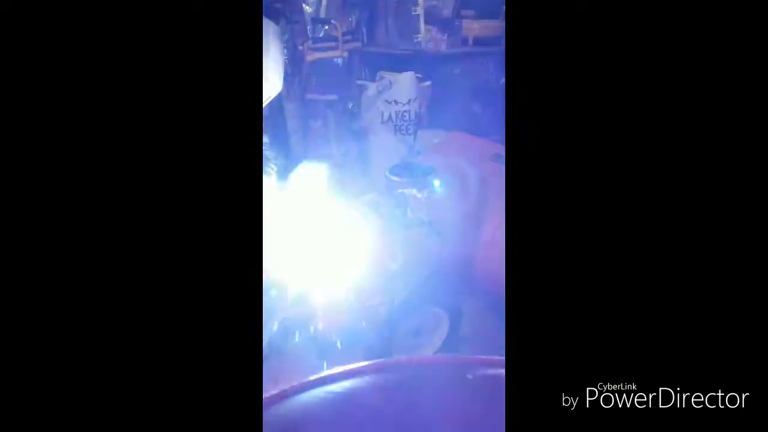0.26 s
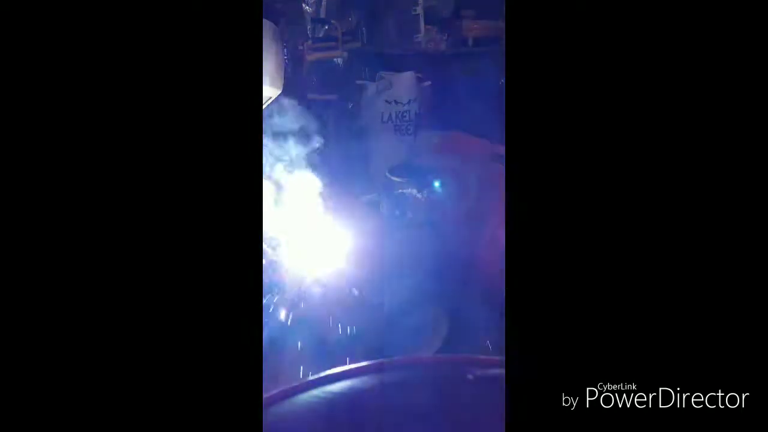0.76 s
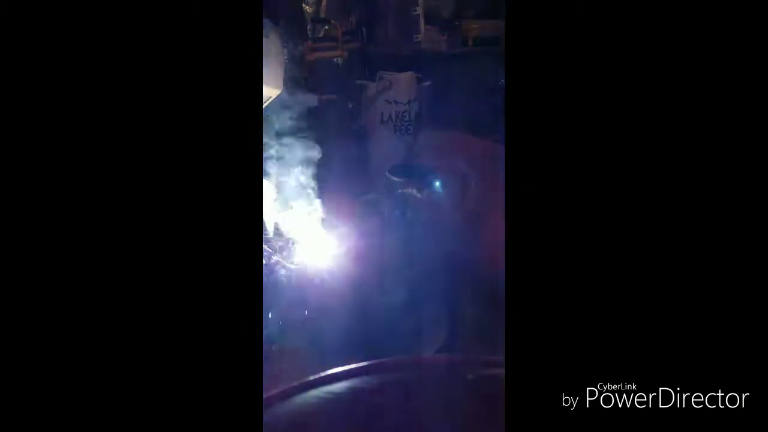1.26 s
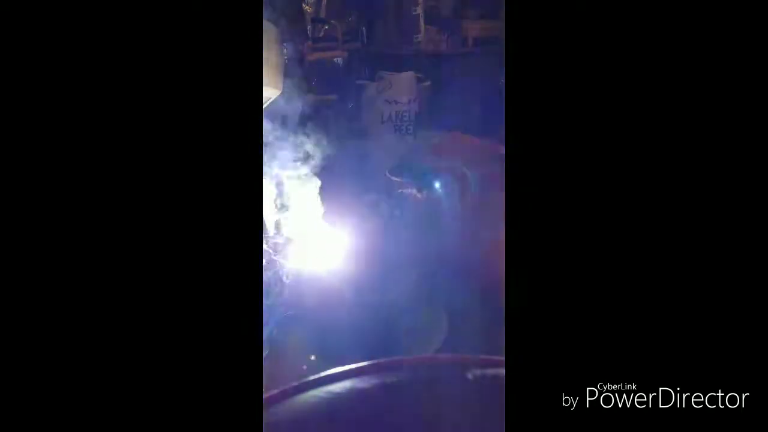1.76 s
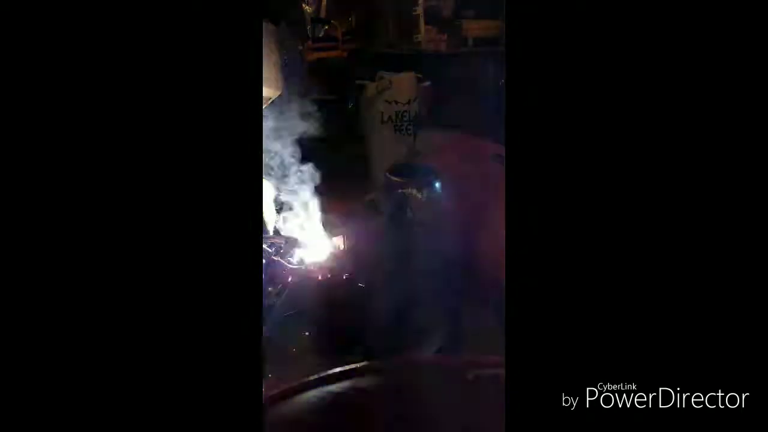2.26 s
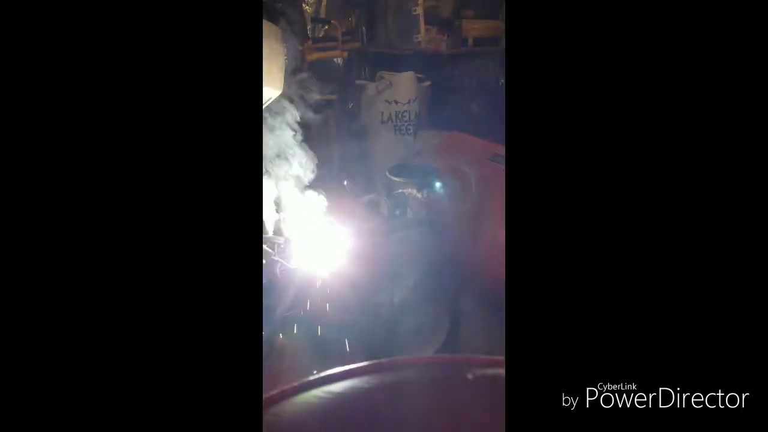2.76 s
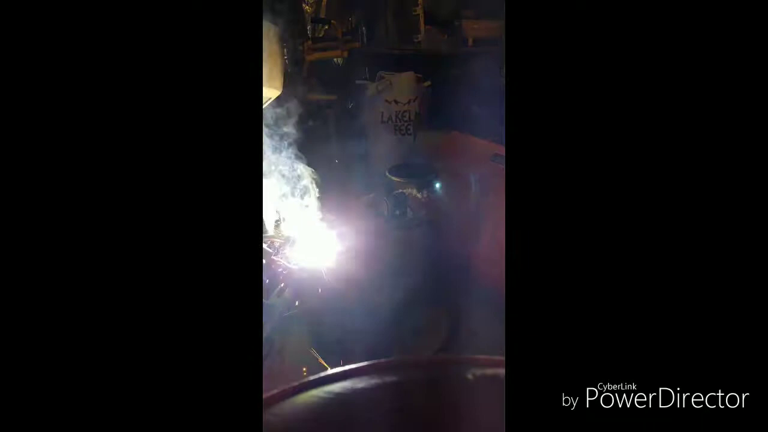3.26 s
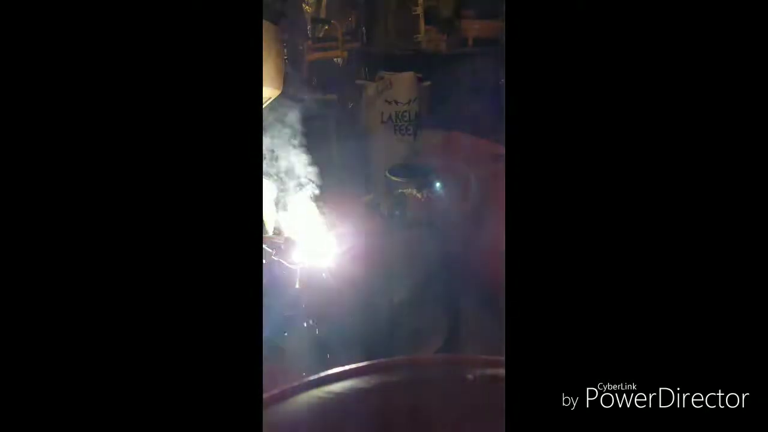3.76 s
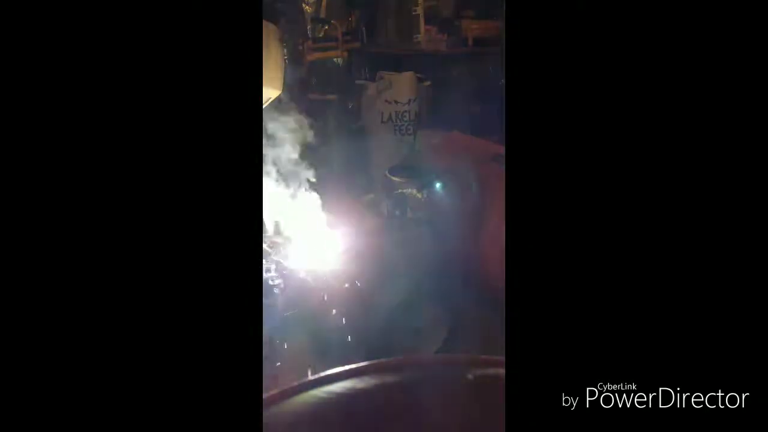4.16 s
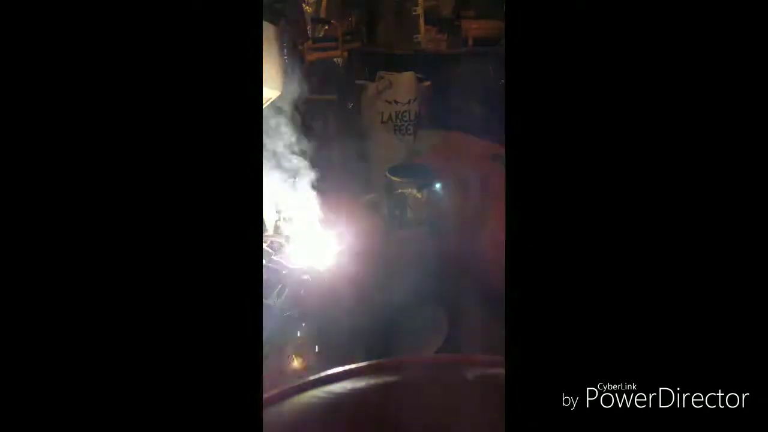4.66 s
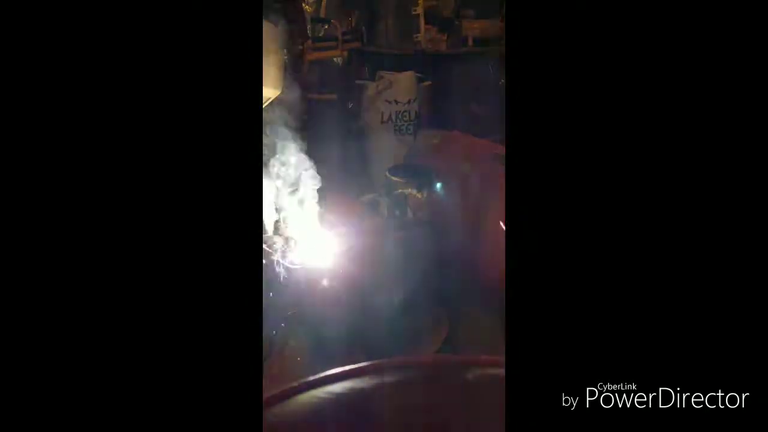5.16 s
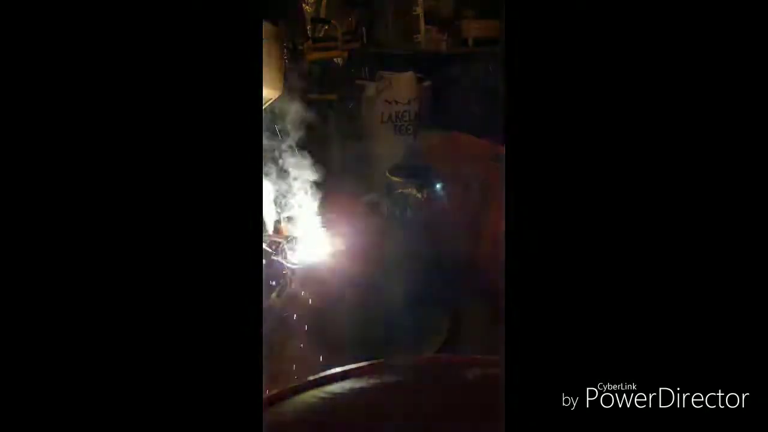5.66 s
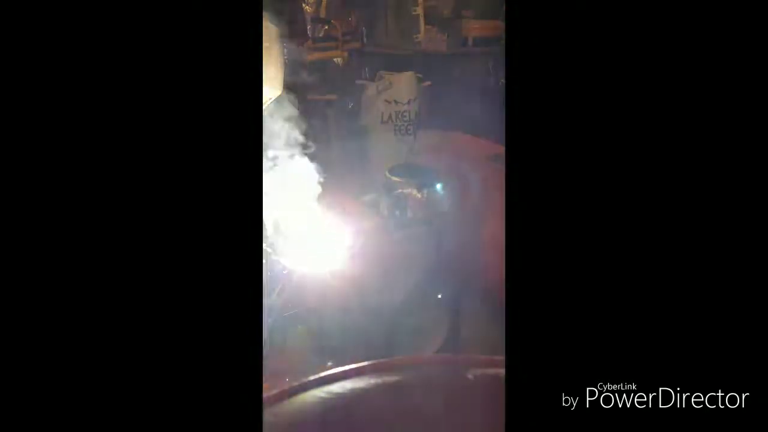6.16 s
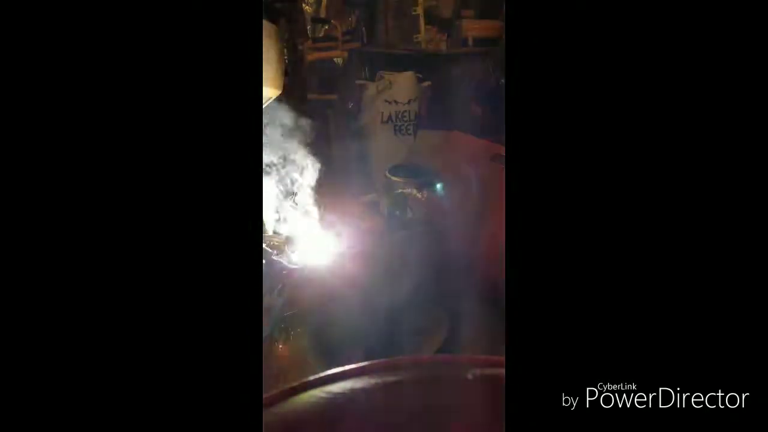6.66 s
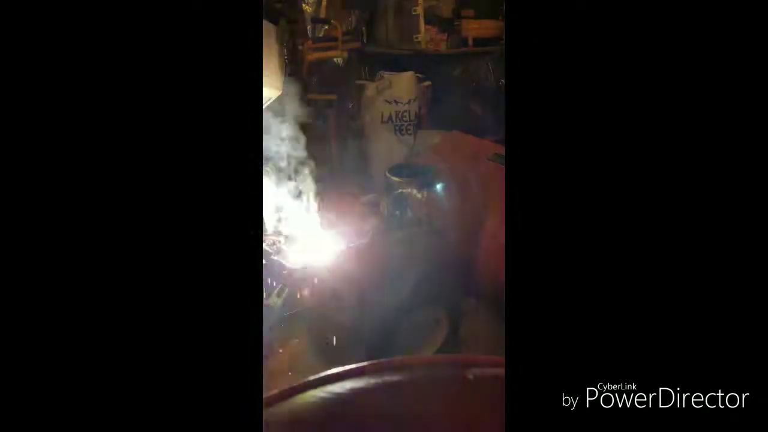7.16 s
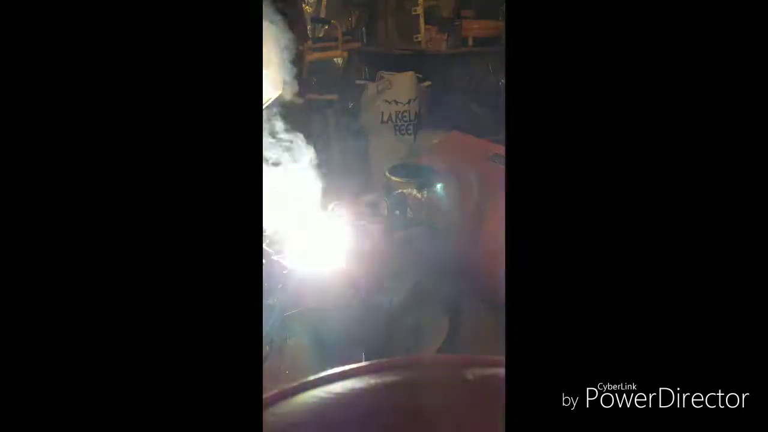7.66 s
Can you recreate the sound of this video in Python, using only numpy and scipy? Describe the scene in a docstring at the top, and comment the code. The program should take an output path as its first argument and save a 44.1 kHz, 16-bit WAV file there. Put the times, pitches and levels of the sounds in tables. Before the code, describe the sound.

Close, dry electric crackling from a welding arc, with fizzing spatter and random hard snaps, runs unbroken in a small garage.

```python
"""Sharp pops over a dense crackle: an arc welder runs a bead on steel in a garage, a little to the left.
Molten drops short the arc and snap as single clicks; tiny discharges crackle as random clicks in clumps.
Echoes, a short tail and low modes colour the clicks at two microphone ports. Spatter fizzes all around,
a noise hiss fades within the first second, faint low pulses swing at a few moments,
and welder and fan hum faintly."""
import sys
import numpy as np
from scipy import signal
from scipy.fft import rfft, irfft
from scipy.io import wavfile
from scipy.ndimage import uniform_filter1d, map_coordinates

SR = 44100
rng = np.random.default_rng(int(sys.argv[2]) if len(sys.argv) > 2 else 0)


def digitize_waveform(pressure):
    """Quantize a signal to 16-bit integers and store it at the path in sys.argv[1].

    Rows of a 2-D input are taken as channels; values are limited to [-1, 1].
    """
    field = np.atleast_2d(pressure).T
    bounded = np.clip(field, -1, 1)
    quanta = np.round(bounded * 32767).astype(np.int16)
    wavfile.write(sys.argv[1], SR, quanta)


N = 348390

# drops that short the arc; the row at 7.2161 s is the 7.2084 s pop coming back off a wall: t/s, body level/dB,
# bite level/dB, treble level/dB
DROP_POPS = [(0.0316, -5, -13, -0.5), (0.075, -0.5, 0, 2.5), (0.227, -5, -1, -2), (0.2353, -2.5, 4.5, -1),
             (0.2708, 1.5, 1, -5), (0.4022, -11, -5, -7), (0.5088, -4, -11, -7), (0.591, -8, -11, -16),
             (0.6084, -7, -10, -7), (0.6169, -2, -4, -6), (0.6331, -2, 0, -4), (0.722, -19, -12, -11),
             (0.7904, -17, -8, -7), (0.8785, -0.5, -7, -18), (0.892, 4.5, -0.5, -10),
             (0.9804, 4.5, -5, 0.5), (1.0704, -20, -16, -5), (1.1151, 1, -15, -15), (1.1506, -12, -18, -9),
             (1.2284, -6, -6, -4), (1.2338, -14, -12, -8), (1.2604, -5, -13, -3), (1.333, -15, -6, -13),
             (1.3421, -5, -13, -3), (1.3698, -24, -19, -11), (1.4594, -1, -4, -6), (1.4716, -13, -9, -10),
             (1.5172, -15, -23, -11), (1.5498, -11, -10, -16), (1.5806, -20, -5, -4), (1.5855, -4, -7, -10),
             (1.642, -2, -4, -5), (1.6683, -5, -5, -4), (1.681, -8, -7, -8), (1.6877, -7, -5, -1),
             (1.7472, -8, -13, -5), (1.768, -6, -4, -5), (1.7924, -9, -3, -3), (1.944, -20, -21, -7),
             (1.9517, -12, -2, -4), (2.013, -1.5, -7, -2), (2.0604, 0, -17, -3), (2.0658, -3, -1, -1),
             (2.0752, -1.5, 0, 0), (2.1161, -16, -5, -3), (2.1286, -21, -12, -10), (2.1941, -9, -4, -4.5),
             (2.2474, 6, 3, 3.5), (2.3123, -11, -13, -4), (2.3518, 2, 1, -4), (2.4611, -1.5, -11, -5),
             (2.5008, -10, -8, -6), (2.5246, -23, -16, -8), (2.5506, 8, -1, -1), (2.6206, -2.5, -15, -5),
             (2.6383, -12, -15, -13), (2.6924, 1.5, -11, -13), (2.7381, -6, -17, -15), (2.7915, 3, -4, -10),
             (2.8657, -17, -4, -11), (2.8875, -4, -4, -3), (2.9047, 2, -7, 1), (2.9681, -3, -4, -6),
             (2.9745, -2.5, -1.5, -3), (3.002, -2, 1, -4), (3.0402, 1.5, -6, -15), (3.1143, -2, -22, -11),
             (3.1333, -5, -17, -15), (3.17, -16, -16, -1), (3.2009, -1, -6, -15), (3.2384, 6.5, -1, -22),
             (3.2962, 0, 1, -4), (3.378, -4, -22, -6), (3.4012, -16, -6, -16), (3.4339, -9, -21, -4),
             (3.499, -2.5, -16, -3), (3.526, 1, 0, -1.5), (3.5993, -15, -17, -8), (3.626, -5, -10, -5),
             (3.6365, 5, -5, -22), (3.6453, 5, -6, 0), (3.6663, 1, -11, -1), (3.6768, -8, -3, -7),
             (3.6822, 4, -2, -6), (3.6902, 1.5, 2, 3), (3.7011, -13, -7, -2), (3.7406, -18, -16, -10),
             (3.7736, 1.5, -4, -5), (3.7926, 5.5, -6, -2), (3.8011, -3, -4, -5), (3.8612, 1, 3.5, 1.5),
             (3.9206, -15, -12, -8), (3.9274, -4, 4, 3), (4.0013, -13, -12, -7), (4.1012, -6, -7, -11),
             (4.2928, -8, -15, -10), (4.2987, -22, -18, -9), (4.35, -3.5, -6, -5.5), (4.3808, -20, -14, -9),
             (4.406, -27, -11, -7.5), (4.4507, -5.5, -7, -8), (4.5053, -12, -15, -17),
             (4.5384, -12, -8, -7), (4.548, -18, -25, -9), (4.7164, -0.5, -2.5, -4), (4.7227, -12, -19, -8),
             (4.77, -14, -16, -8), (4.8403, -8, -9, -8), (4.8573, -6, -10, -14), (4.9992, -5.5, -4, -5),
             (5.0296, -5, -5, -8), (5.0689, -2.5, -10, -7), (5.0953, -24, -13, -17), (5.1978, -4, -7, -6.5),
             (5.209, -8, -7, -7), (5.2212, -2.5, -11, -18), (5.321, -6, -6, -2), (5.3677, -6, -15, -10),
             (5.3994, -1.5, 1.5, 5), (5.4368, -9, 3, 0), (5.4456, -20, -7, -8), (5.5072, -8, -6, -1.5),
             (5.5275, -5, 0, -5), (5.5744, -19, -14, -14), (5.5875, -14, -11, -10), (5.698, -10, -10, -8),
             (5.7038, -7, -2.5, -4), (5.73, -19, -16, -7), (5.7504, -18, -14, -5.5), (5.7846, -19, -11, -5),
             (5.799, -10, -21, -12), (5.8373, -3, -8, -5), (5.8517, -14, -17, -9), (5.8559, -1.5, -5, -16),
             (5.8777, -5, -6, -19), (5.9439, -2, -9, -20), (6.11, -12, -11, -7), (6.1244, -11, -5, -11),
             (6.1722, -2, -6, -4), (6.1931, -3, -5, -5), (6.2215, -10, -7, -5), (6.2364, -22, -11, -8),
             (6.2484, -23, -8, -9), (6.3486, -4, -17, -14), (6.436, -4.5, -28, -13), (6.4704, -3.5, 2, -4),
             (6.475, -12, -11, -12), (6.546, -18, -24, -8), (6.5652, -19, -16, -16), (6.5916, 1, -7, -2),
             (6.6162, -7, -14, -3), (6.6507, 1.5, -7, -3), (6.657, -7, -7, -3), (6.6727, -12, -14, -6),
             (6.796, -15, -13, -8), (6.8494, -2, -13, -13), (6.8595, -17, -5, -9), (6.8771, -0.5, -2, -2),
             (6.928, -4, -9, -12), (6.9694, 4, 3, 0), (7.0372, 1.5, 1, -5), (7.0843, -3, -14, -8),
             (7.128, -1, -4, -6), (7.1694, -3, -7, 0), (7.1924, -17, -9, -8), (7.2084, 3, 1, -6),
             (7.2161, -12, -12, -5), (7.2759, 1.5, -5, -9), (7.2934, 1.5, 4, 4.5), (7.3763, 1, -5, -2),
             (7.391, 2, -6, -0.5), (7.411, -2, -7, -3), (7.4212, -11, -12, -14), (7.5159, -2.5, -1.5, -0.5),
             (7.5404, -17, -13, -6), (7.5712, -17, -25, -12), (7.5985, -9, -12, -5),
             (7.6392, -3.5, -2.5, -2), (7.6776, -10, -9, -10), (7.7049, -3, -6, -8),
             (7.7118, -13, -15, -12), (7.77, -5, -4, -3), (7.8191, 0, -9, -7.5), (7.872, -14, -13, -10)]
# the burning arc: t/s, burn level/dB, extra weight of its mids and lows/dB
ARC_BURN = [(0.0, -33.5, 1.5), (0.44, -32.5, -0.5), (0.86, -35, 2.5), (1.14, -36, 2.5), (1.89, -30.5, 4.5),
            (2.38, -32.5, 1), (3.78, -31, 3.5), (4.0, -35.5, 4), (4.4, -37.5, 5.5), (4.53, -41, 3),
            (4.8, -40.5, 0), (5.2, -35, 1), (5.3, -34, 1.5), (5.41, -37, 4.5), (5.7, -34.5, 5.5),
            (6.25, -35.5, 4.5), (7.08, -31.5, 0), (7.63, -36.5, 5.5), (7.9, -36.5, 3)]
ECHO_CUT_HZ = 815  # small surfaces return little bass
LEAD_IN = 64  # samples ahead of the direct sound, leaving room for the shading filter


def pops():
    """Each pop is a snap of pressure with its own body and bite; its treble is a brief flurry of sparks."""
    body_hz, treble_hz, cut_hz = 3540, 7040, 70  # body under the first, treble over the second
    short_s, long_s = .00008, .0009  # flurry decay: brief for a strong pop, up to the longer for a weak one
    lead, length = 24, 128  # samples of flurry before its centre, and in all
    rows = np.r_[DROP_POPS, small_pops()]
    draws = rng.standard_normal((len(rows), length + 1))
    weak = np.interp(-rows[:, 3:], [3, 12], [0, 1])  # treble from -3 dB down to -12 dB
    stretch = weak * abs(np.tanh(draws[:, :1]))
    decay = SR * (short_s + (long_s - short_s) * stretch)
    sparks = rfft(draws[:, 1:] * np.exp(-abs(np.arange(length) - lead) / decay))
    sparks = irfft(sparks / np.sqrt(uniform_filter1d(abs(sparks) ** 2, size=9)))  # even in colour

    at = np.round(rows[:, 0] * SR).astype(int)
    body, bite, treble = np.zeros((3, N + length))
    body[at] = gain_of(rows[:, 1])
    bite[at] = gain_of(rows[:, 2])
    np.add.at(treble, at[:, None] + np.arange(length) - lead, gain_of(rows[:, 3:]) * sparks)
    snaps = lows(body - bite, body_hz) + lows(bite - treble, treble_hz) + treble
    return signal.lfilter(*signal.butter(1, cut_hz, "high", fs=SR), snaps[:N])  # too brief to move bass


def small_pops(per_s=25, over_arc_db=16, spread_db=6):
    """Lesser drops at chance moments, each band's size drawn around the level of the burn."""
    draws = rng.random((round(per_s * N / SR), 4))
    s = .01 + draws[:, 0] * (N / SR - .02)
    burn = curve(ARC_BURN, 1)[(s * SR).astype(int), None]
    return np.c_[s, burn + over_arc_db + spread_db * (2 * draws[:, 1:] - 1)]


def crackle(clumps, per_s=700., spread_db=4.4):
    """Some hundreds of tiny discharges a second of random sign, a few of them large."""
    chance, size, sign = rng.random(N), rng.exponential(1, N), rng.choice([-1., 1.], N)
    train = (chance < per_s / SR) * gain_of(spread_db * np.minimum(size, 4.5)) * sign
    train = evened(train * clumps) * gain_of(arc_db() - 6.0)
    weight = gain_of(curve(ARC_BURN, 2)) * flutter(depth_db=1.5, span=970)
    return tilted(train * weight, train)


def arc_db():
    """Level of the arc: slow burn, flares, and a hush while a large drop bridges the gap."""
    hush_s, hush_db, full_over_db = .012, -4.5, 33.  # pops this far over the burn get the full hush
    s = np.transpose(DROP_POPS)[0]
    loudest_db = np.transpose(DROP_POPS)[1:].max(0)
    burn, drops = curve(ARC_BURN, 1), np.zeros(N)
    at = np.round(s * SR).astype(int)
    drops[at] = gain_of(loudest_db - burn[at] - full_over_db)
    before = np.exp(-np.arange(4000) / (hush_s * SR))
    hush = signal.oaconvolve(drops[::-1], before)[:N][::-1]  # reversed: deepens towards the pop
    return burn + flares_db() + hush_db * np.minimum(hush, 1)


def flares_db():
    """The arc sputters up or sags, each time as one smooth bell-shaped swell or dip."""
    # bursts and sags: centre t/s, width at half height/s, rise/dB
    flares = [(.048, 0.082, 4), (.17, 0.036, -2), (.281, 0.061, 2.5), (.411, 0.053, 3), (.57, .05, 0.5),
              (.634, 0.05, 5), (.77, 0.022, -1), (.82, .05, 0), (.88, 0.046, 5.5), (.96, .03, 1),
              (1.141, 0.19, 7.5), (1.2, 0.056, -5.5), (1.257, 0.034, 5), (1.42, 0.042, 5), (1.54, .03, 0.5),
              (1.685, 0.26, 1), (1.74, 0.016, -2), (1.91, 0.038, -1), (2.01, 0.032, 0.5),
              (2.361, 0.036, 3.5), (2.42, 0.074, -2.5), (2.561, 0.099, 0), (2.692, 0.012, 6),
              (2.78, .025, -0.5), (2.9, 0.051, 1), (3.09, 0.029, -0.5), (3.19, 0.075, 5), (3.31, 0.055, 5),
              (3.44, 0.019, -1), (3.62, 0.023, 1), (3.694, 0.037, 3), (3.84, 0.021, -1), (3.935, 0.089, 6),
              (4.086, 0.035, 1.5), (4.221, 0.075, 0.5), (4.293, 0.0082, 4), (4.542, 0.048, 6),
              (4.726, 0.087, 5.5), (4.857, 0.043, 3), (4.91, .04, -1.5), (5.14, 0.042, -4.5), (5.3, .03, 3),
              (5.339, 0.041, 1.5), (5.409, 0.1, 8.5), (5.517, 0.049, 6), (5.67, 0.082, -6.5),
              (5.746, .03, 0), (5.851, 0.056, 1.5), (6.04, 0.084, -3), (6.159, .04, 0.5), (6.38, 0.06, -4),
              (6.609, 0.028, 4), (6.655, 0.036, 6), (6.72, 0.033, -4.5), (6.812, 0.049, 3.5),
              (6.882, 0.056, 3), (7.17, 0.1, 3.5), (7.41, 0.022, 11.5), (7.48, 0.033, -0.5)]
    t = np.arange(0, N / SR + .002, .001)
    swell = sum(db * np.exp(-4 * np.log(2) * ((t - s) / width) ** 2) for s, width, db in flares)
    return np.interp(np.arange(N) / SR, t, swell)


def discharge_colour():
    """Impulse response for the colour of a discharge, with the modes of garage and bench ringing in it."""
    # colour of a discharge at the microphones: f/Hz, level per Hz/dB
    spectrum = [(24, -27), (60, -34), (120, -20.5), (310, -15.5), (380, -7), (900, -7), (1450, -8),
                (1700, -4.5), (3500, -2.5), (6000, -0.5), (7800, -6), (9300, 1.5), (11700, 3),
                (14000, -0.5), (15400, -8), (15800, -28), (16600, -44)]
    # modes of the garage and bench: f/Hz, width/Hz, boost or dip/dB
    modes = [(160, 13, 12), (185, 16, 6), (242, 13, 7), (285, 9, 7), (352, 30, 8), (432, 24, 3),
             (310, 30, -5), (485, 25, -5), (520, 40, 3), (550, 30, 3), (619, 22, 6), (660, 25, 4),
             (742, 20, 7), (805, 40, -7), (851, 36, 5), (1071, 40, 4), (1211, 60, 5), (1319, 50, 5),
             (1530, 30, 4), (1583, 45, 5), (1701, 45, 5), (1798, 40, 3), (1890, 22, 6), (2148, 28, 3),
             (2245, 30, 5), (2320, 30, 2), (2406, 30, 5), (2546, 40, 3), (3074, 45, 6), (4752, 30, 5),
             (5394, 48, 5), (5772, 30, 4), (5864, 38, 4), (6518, 50, 6), (9608, 90, 4), (10563, 60, 5),
             (10970, 60, 3), (11455, 60, 4), (11688, 70, 4)]
    hz = np.fft.rfftfreq(16384, 1 / SR)
    modes_db = sum(db / (1 + (2 * (hz - f) / width) ** 2) for f, width, db in modes)
    return causal(read(spectrum, hz) + modes_db + 3.5)


def garage(x, distant, half_turns_per_s=3.0):
    """The arc wanders, so the tail of what reaches the walls drifts among three patterns of reflections."""
    out = signal.oaconvolve(x[None], near(), axes=1)[:, LEAD_IN:LEAD_IN + N]
    for k in range(3):
        turn = np.pi * (half_turns_per_s * np.arange(N) / SR + k / 3)
        share = np.sqrt(2 / 3) * np.cos(turn)  # the three powers always sum to 1
        out = out + signal.oaconvolve((distant * share)[None], tail(), axes=1)[:, :N]
    return out


def near():
    """Direct sound and first echoes at each port; the recorder's body shades and delays the right one."""
    # first echoes off bench, floor and walls: delay t/s, left level/dB, right level/dB
    echoes = [(.0005, -20, -11), (.0012, -13, -20), (.0021, -17, -12), (.0029, -20, -14), (.0043, -14, -20),
              (.0052, -22, -12), (.0063, -22, -17), (.0078, -14, -22), (.0083, -16, -11), (.0105, -13, -18),
              (.0135, -21, -15)]
    # direct sound, left port against right, beyond the plain delay: f/Hz, louder/dB, phase ahead/rad
    shadow = [(100, 0, 0), (1000, 3, -.7), (1700, 1, -1.3), (2300, -2, -.8), (3000, 2, -.3),
              (4000, 0, -.55), (5400, -2, .1), (7500, 1, 3.1), (9000, 6, 3.7), (9800, 8, 2.8),
              (11500, 3, 2.3), (12600, 5, 2.3), (13400, 4, 1.), (15300, 0, 3.1)]
    smear_s, port_lag = 0.00015, 6  # rough surfaces blur each echo; right port lags, in samples
    room = np.zeros((2, 2048))
    for s, *db in echoes:
        smear = rng.standard_normal((2, 48)) * np.exp(-np.arange(48) / (smear_s * SR))
        smear *= (gain_of(db) / np.linalg.norm(smear, axis=1))[:, None]
        room[:, LEAD_IN + round(s * SR):][:, :48] += smear
    room = signal.lfilter(*signal.butter(2, ECHO_CUT_HZ, "high", fs=SR), room)

    hz = np.fft.rfftfreq(256, 1 / SR)
    f, db, ahead = np.transpose(shadow)
    shaded = irfft(gain_of(-np.interp(hz, f, db)) * np.exp(-1j * np.interp(hz, f, ahead)))
    room[0, LEAD_IN] += 1
    room[1, :256] += np.roll(shaded, LEAD_IN + port_lag)
    return room


def tail():
    """Sparse taps of random sign, dying band by band, thin in the bass where the modes rule."""
    # decay of the tail: f/Hz, time to fall 60 dB t/s
    decay = [(300, 1), (800, 0.034), (2000, 0.25), (5500, 0.12), (14000, 0.09)]
    # level of the tail, one row a port, left then right: level/dB
    port_db = [
        [0],
        [1],
    ]
    alike_hz, rise_s = 760.0, 0.0021
    taps = np.zeros((2, SR // 2))
    at = np.arange(40, SR // 2 - 40, 20) + rng.integers(0, 20, (2, (SR // 2 - 61) // 20))
    np.put_along_axis(taps, at, rng.choice([-1., 1.], at.shape), 1)
    hz, t, z = signal.stft(taps, SR, nperseg=256)
    same = 1 / (1 + (hz[:, None] / alike_hz) ** 2)  # bass reaches both ports alike
    z[1] = same * z[0] + np.sqrt(1 - same ** 2) * z[1]
    z *= gain_of(-60 * t / read(decay, hz)[:, None])
    z *= (hz ** 2 / (hz ** 2 + ECHO_CUT_HZ ** 2))[:, None]
    out = signal.istft(z, SR, nperseg=256)[1]
    out *= np.minimum(np.arange(out.shape[1]) / (rise_s * SR), 1)
    return gain_of(port_db) * out / np.linalg.norm(out[0])


def fizz():
    """Spatter fizzes over the bench: noise partly different at each port, lagging the arc's level a little."""
    # spatter against the colour of the arc: f/Hz, level/dB
    spatter_colour = [(30, 6), (90, 5), (150, 2.5), (500, 2.5), (1000, 0), (1500, 1), (4000, 2), (8000, -2),
                      (15000, -3)]
    # likeness of left and right: f/Hz, correlation (0 to 1)
    likeness = [(30, 0.4), (90, 0.6), (200, .9), (600, 0.8), (1500, 0), (4000, 0), (15000, 0)]
    lag_s = 0.0023
    hz = np.fft.rfftfreq(N, 1 / SR)
    left, other = rfft(rng.standard_normal((2, N)))
    same = np.clip(read(likeness, hz), -1, 1)
    right = same * left + np.sqrt(1 - same ** 2) * other
    noise = irfft(np.array([left, right]) * gain_of(read(spatter_colour, hz)), N)
    lag = np.exp(-1 / (lag_s * SR))
    start_db = ARC_BURN[0][1]
    level_db = signal.lfilter([1 - lag], [1, -lag], arc_db() - start_db) + start_db
    return noise * gain_of(level_db - 2.5)


def settling():
    """While the arc settles, noise hisses in resonances that drift together and swell with each flare."""
    # resonances of the hiss: f/Hz, width/Hz, level/dB
    peaks = [(112, 35, -27), (166.5, 18, -15), (437, 7, -23), (2420, 50, -9), (2520, 91, -7.5),
             (2540, 1300, 0.5), (3980, 640, -2), (5330, 460, -4), (5880, 460, -0.5), (6580, 39, -10)]
    level_db, db_per_flare_db = -45.5, 1.67
    silent_s, fade_s = 0.98, 0.52  # the fade ends in silence at the first time
    wander = .015  # rms share by which the resonances drift
    noise = signal.lfilter(*signal.butter(3, [65., 9000.], "band", fs=SR), rng.standard_normal(SR))
    hiss = sum(gain_of(db) * evened(signal.lfilter(*signal.iirpeak(hz, hz / width, SR), noise))
               for hz, width, db in peaks)
    drift = evened(uniform_filter1d(uniform_filter1d(rng.standard_normal(N), size=2500), size=2500))
    hiss = map_coordinates(hiss, [np.cumsum(1 + wander * drift)], order=3)  # played at a drifting speed
    fade = np.clip((silent_s - np.arange(N) / SR) / fade_s, 0, 1)
    return hiss * gain_of(level_db + db_per_flare_db * flares_db()) * fade


def low_pulses(length_s=0.003):
    """Faint low pulses at a few moments: each a quick low swing, then a slower one the other way."""
    # low pulses: t/s, level before a common lift of 1 dB/dB
    pulses = [(2.069, -62), (2.619, -57), (3.929, -66), (5.4, -47), (5.799, -64)]
    s, db = np.transpose(pulses)
    train = np.zeros(N)
    train[np.round(s * SR).astype(int)] = gain_of(db + 1.0)
    u = np.arange(2000) / (length_s * SR)
    return signal.oaconvolve(train, u * np.exp(1 - u) * (1 - u / 2))[:N]


def hum():
    """The welder hums with its load: steady tones that waver a little and swell with the burn."""
    # tones: f/Hz, level against the burn/dB, rms waver/Hz
    tones = [(240, -36, 3), (285.3, -33, 2)]
    out = 0
    for hz, db, waver_hz in tones:
        drift = evened(uniform_filter1d(uniform_filter1d(rng.standard_normal(N), 4000), 4000))
        level = gain_of(db) * flutter(depth_db=4.5, span=2700)
        out = out + level * np.sin(2 * np.pi * np.cumsum(hz + waver_hz * drift) / SR)
    return np.sqrt(2) * out * gain_of(curve(ARC_BURN, 1))


def fan():
    """One faint tone, likely the welder's cooling fan, drifting in pitch and wavering in level."""
    # the tone: t/s, f/Hz, rms level/dB
    fan_tone = [(0, 442.6, -53), (.7, 444, -60), (1.2, 431, -62), (1.87, 432.7, -59), (2.7, 438.7, -53),
                (3, 446, -60.5), (4.1, 432, -65), (4.8, 435, -85), (5.17, 432.4, -57), (5.6, 432, -65),
                (6, 427, -73), (6.9, 435, -58.5), (7.5, 432, -60), (7.9, 436, -73)]
    level = np.sqrt(2) * gain_of(curve(fan_tone, 2)) * flutter(depth_db=2.0, span=3700)
    return level * np.sin(2 * np.pi * np.cumsum(curve(fan_tone, 1)) / SR)


def flutter(depth_db, span=350):
    """Random level changes of the given rms depth, slower for a longer span in samples."""
    chance = uniform_filter1d(uniform_filter1d(rng.standard_normal(N), round(span)), round(span))
    return gain_of(depth_db * evened(chance))


def patchy(x, depth_db=1.7):
    """Colour that shifts in patches of some hundred hertz by some tens of milliseconds."""
    z = signal.stft(x, nperseg=256)[2]
    patches = uniform_filter1d(uniform_filter1d(rng.standard_normal(z.shape[-2:]), 5, 0), 16, 1)
    return signal.istft(z * gain_of(depth_db * evened(patches)), nperseg=256)[1][..., :N]


def lows(x, cut_hz):
    """The part under a cut, without delay."""
    return signal.oaconvolve(x, signal.firwin(31, cut_hz, fs=SR), "same")


def tilted(low_train, high_train, split_hz=4860):
    """Mids and lows from one train of clicks, treble from the other."""
    return lows(low_train, split_hz) + high_train - lows(high_train, split_hz)


def causal(db):
    """Minimum-phase impulse response for a gain given in dB on rfft bins."""
    both_sides = np.r_[db, db[-2:0:-1]]
    log_gain = np.log(gain_of(np.maximum(both_sides, -100)))
    return np.fft.ifft(np.exp(np.conj(signal.hilbert(log_gain)))).real[:8192]


def read(points, hz):
    """Reads a spectrum on a log-frequency axis."""
    f, value = np.transpose(points)
    return np.interp(np.log(hz + 1), np.log(f + 1), value)


def curve(rows, column):
    """Reads one column of a curve at every sample."""
    rows = np.array(rows)
    return np.interp(np.arange(N) / SR, rows[:, 0], rows[:, column])


def evened(x):
    """Scales to rms 1."""
    return x / np.sqrt(np.mean(x ** 2) + 1e-20)


def gain_of(db):
    """Decibels to gain."""
    return 10 ** (np.asarray(db) / 20)


def scene():
    """Clicks take the discharge colour and, with the hiss, pass through the garage; the rest is added."""
    # hiss balance, one row a port, left then right: level/dB
    hiss_pan_db = [
        [-5],
        [3],
    ]
    pop_tail_db = -2.5  # a pop aims its sound forward and wakes the garage less
    colour = discharge_colour()[None]
    clumps = flutter(depth_db=1.5) * flutter(depth_db=0.5, span=116)  # long and short clumps of sputter
    clicks = [pops(), patchy(crackle(clumps))]
    snaps, sizzle = signal.oaconvolve(clicks, colour, axes=1)[:, :N]
    arc = garage(snaps + sizzle, gain_of(pop_tail_db) * snaps + sizzle)
    hiss = settling()
    hiss = gain_of(hiss_pan_db) * garage(hiss, hiss)
    scattered = signal.oaconvolve(patchy(fizz()) * clumps ** 0.52, colour, axes=1)[:, :N]
    return arc + scattered + hiss + low_pulses() + fan() + hum()


def record(dry):
    """The two ports differ in colour; then a steep low-pass sets the band limit."""
    # left port against right: f/Hz, louder/dB
    left_over_right = [(150, 1), (500, -0.5), (1000, -2), (1900, -3), (3800, -1.5), (5500, -3),
                       (9000, -0.5), (15000, -1.5)]
    edge_hz = 16700
    half_db = read(left_over_right, np.fft.rfftfreq(4096, 1 / SR)) / 2
    ports = np.array([causal(half_db)[:1024], causal(-half_db)[:1024]])
    coloured = signal.oaconvolve(dry, ports, axes=1)[:, :N]
    band_limit = signal.firwin(511, edge_hz, window=("kaiser", 9), fs=SR)
    return signal.oaconvolve(coloured, band_limit[None], "same")


dry = scene()
out = record(dry)
digitize_waveform(out)
```